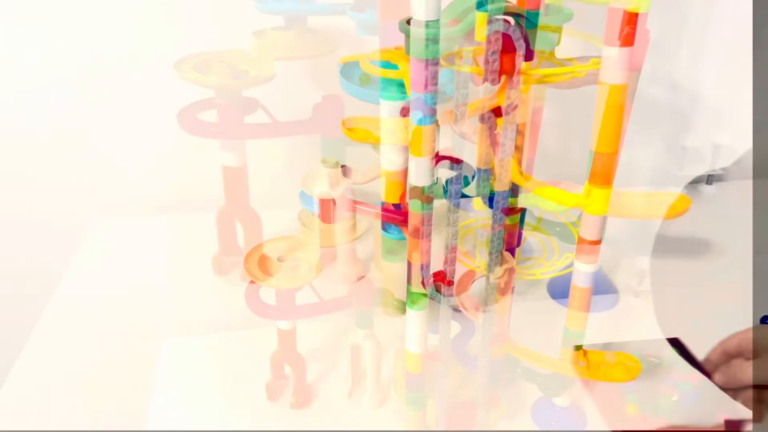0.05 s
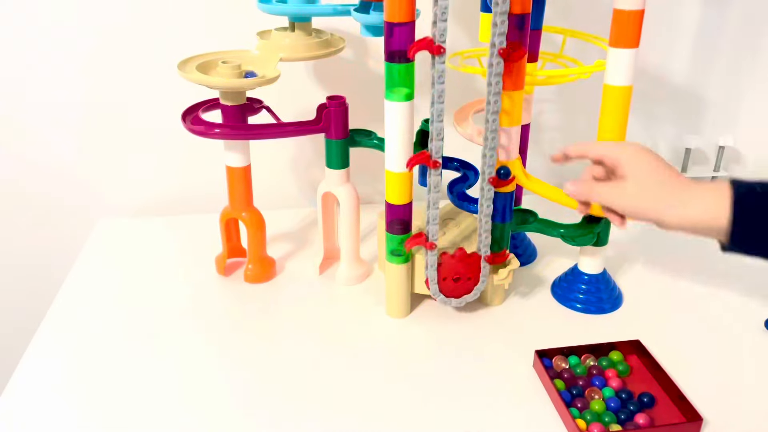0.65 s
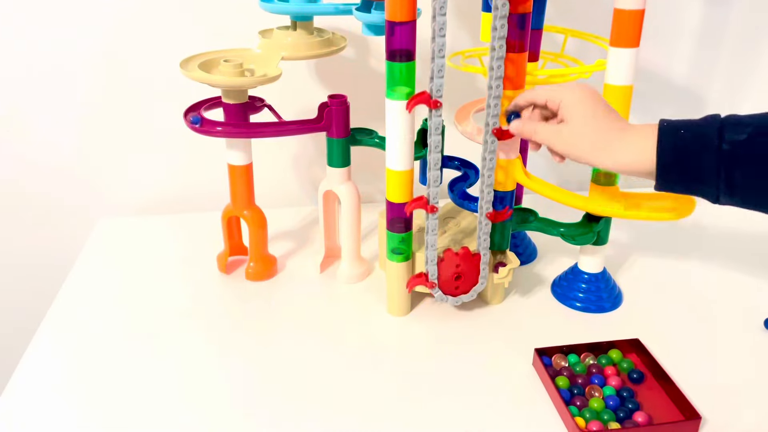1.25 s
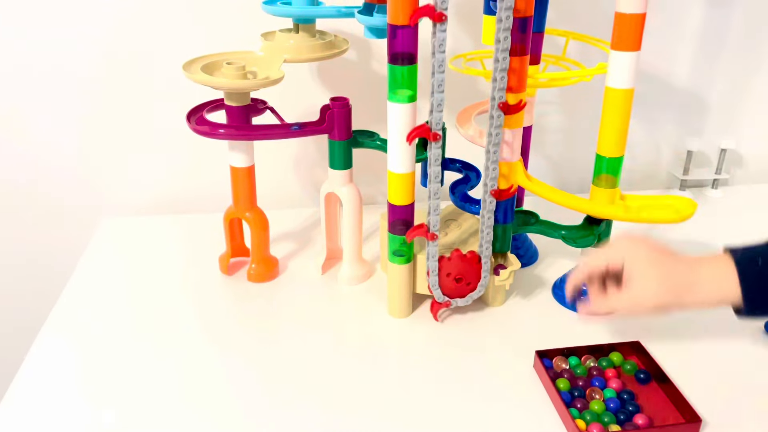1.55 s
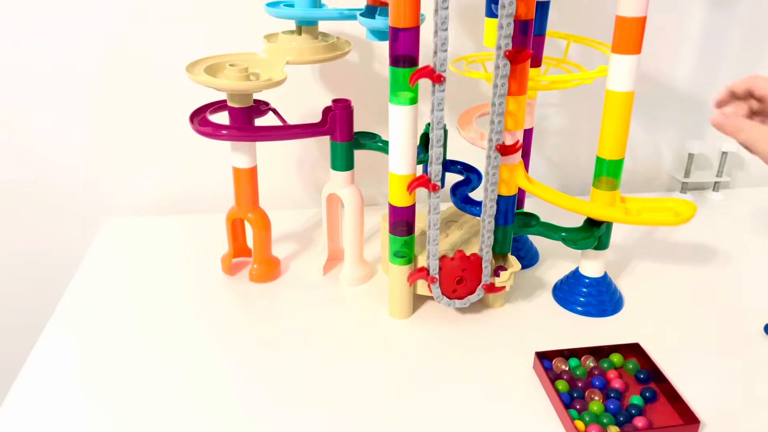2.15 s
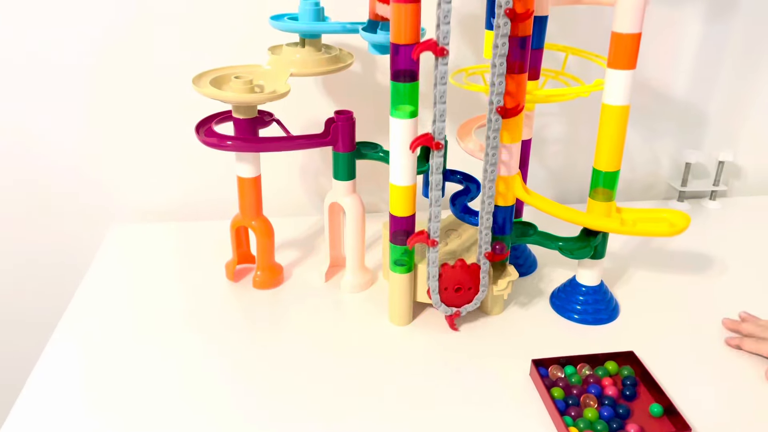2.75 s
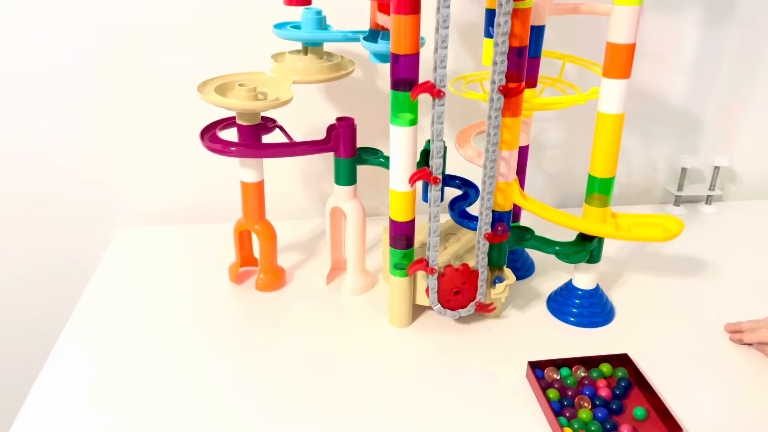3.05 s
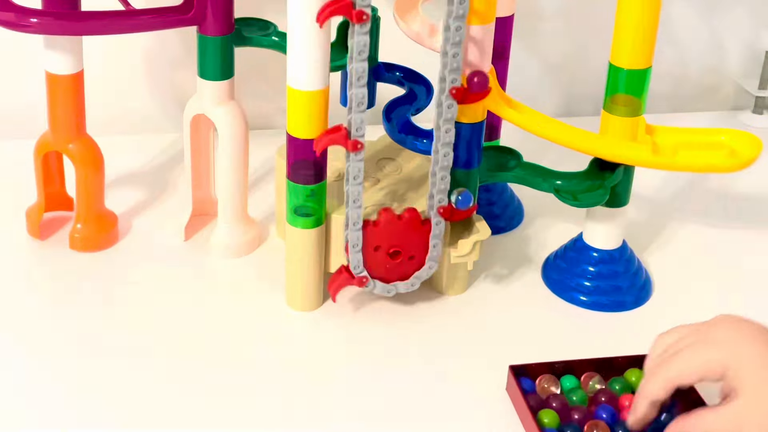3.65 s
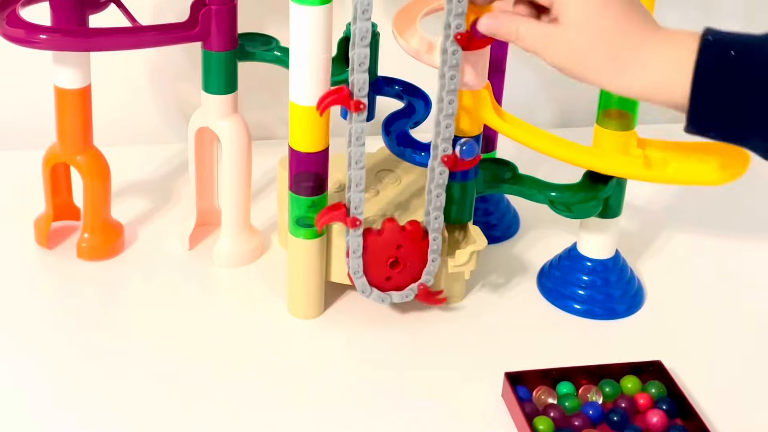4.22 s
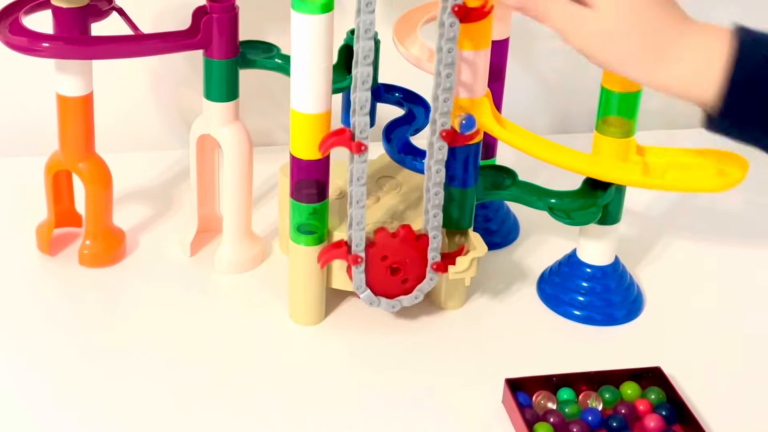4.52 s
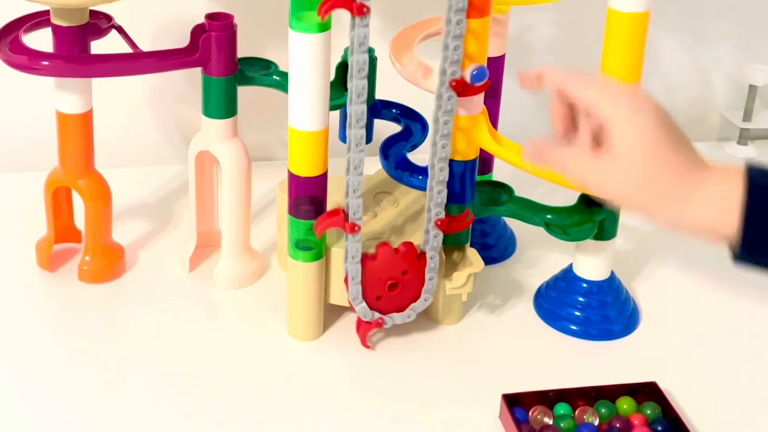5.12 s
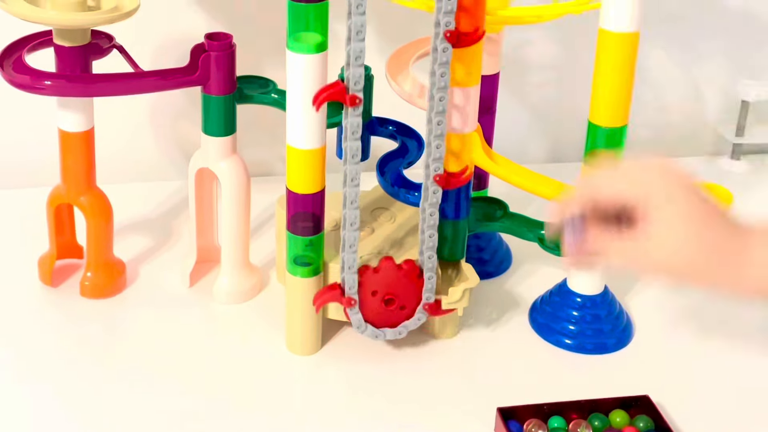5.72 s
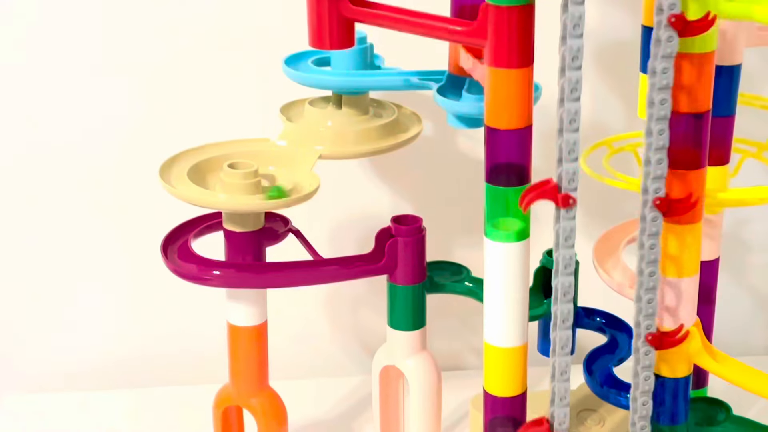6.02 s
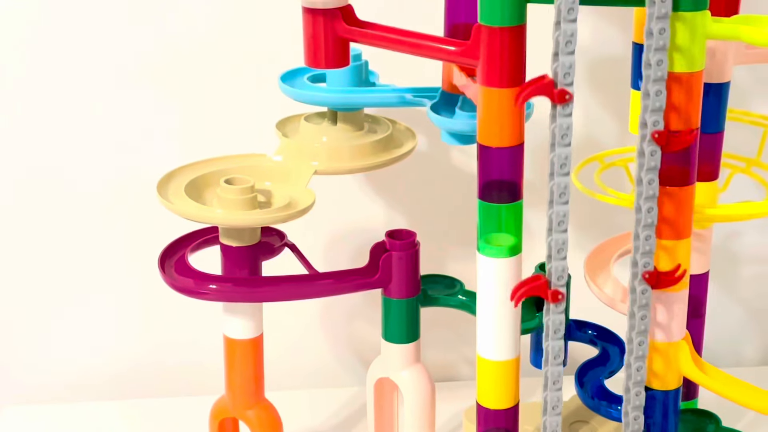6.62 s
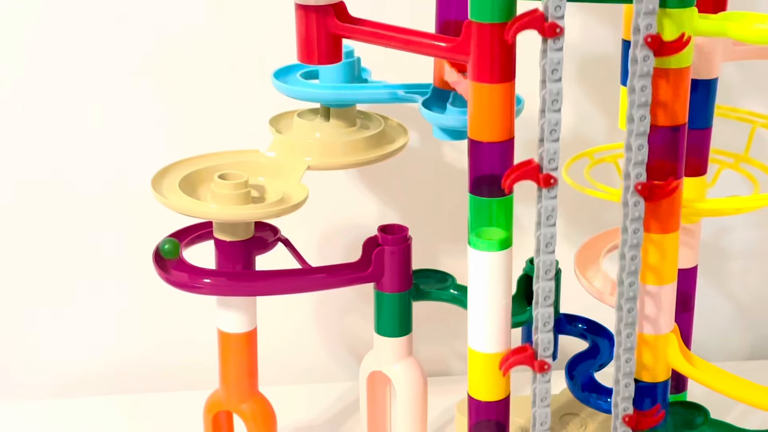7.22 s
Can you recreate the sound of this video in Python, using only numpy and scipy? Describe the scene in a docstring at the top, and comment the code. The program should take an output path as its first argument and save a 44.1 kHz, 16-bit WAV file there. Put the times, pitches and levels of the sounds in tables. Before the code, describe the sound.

A toy chain lift whirrs steadily while marbles clatter and rumble through plastic chutes, one finally circling a funnel.

```python
"""Glass marbles click and roll down a plastic toy track, over the fluttering whirr of a geared lift motor.
Each blow ticks, rings the modes of one track piece and thumps the table through the towers.
Rolling marbles rumble and rattle over seams; late on, one circles a funnel.
The lift gear binds twice a turn, its teeth whine, its chain ticks.
A soft, wavering hum near 740 Hz swells and fades near the end. Small room, close stereo."""
import sys
import numpy as np
from scipy import signal
from scipy.fft import rfft, irfft
from scipy.io import wavfile
from scipy.ndimage import uniform_filter1d

SR = 44100
rng = np.random.default_rng(int(sys.argv[2]) if len(sys.argv) > 2 else 0)


def wav_out(sig):
    """Save sig, one row per channel (or a flat mono array), as 16-bit PCM at SR to the path in sys.argv[1]."""
    wavfile.write(sys.argv[1], SR, np.round(np.clip(np.atleast_2d(sig).T, -1, 1) * 32767).astype(np.int16))


N = 329408
RING_SAMPLES, ATTACK_SAMPLES = int(.36 * SR), int(.02 * SR)

# lift motor: (time [s], turn rate [Hz], level [dB], whine re level [dB])
MOTOR = [(0, 25.94, -56.5, -8), (.5, 26.23, -48, -5), (1.15, 25.2, -49.5, -3), (1.6, 25.73, -51.5, -4.5),
         (2.5, 26.2, -49, -2.5), (3.35, 26.1, -49, -5), (4.5, 26.27, -49.5, -4), (4.85, 26.09, -49.5, -0.5),
         (5.3, 25.33, -49, -4.5), (5.75, 25.42, -50, -6.5), (6.3, 25.73, -46, -5.5),
         (6.9, 26.07, -42, -3.5), (7.47, 26.2, -42, -5)]
# gearbox and whine resonances: (frequency [Hz], width [Hz], level [dB])
GEARBOX_MODES = [(133.6, 15, -13.5), (251.5, 40, -12), (735, 35, -9), (808, 30, -9), (1035, 25, -14),
                 (1215, 60, -7), (1620, 60, -16), (2050, 160, -9)]
WHINE_MODES = [(1416, 65, 0), (1487, 70, -.5), (1380, 130, -9)]
# soft hum near the end: (time [s], level [dB])
HUM_LEVEL = [(6.45, -88), (6.7, -47.5), (7.08, -53), (7.25, -77)]

# gear teeth, rolling, plastic overtones, glass on plastic: (frequency [Hz], level [dB])
TEETH_SPECTRUM = [(25, -22), (55, 3.5), (250, 2), (600, -4.5), (950, -7), (1420, 4), (1750, 1), (2100, 2.5),
                  (2500, -10.5), (4000, -15.5), (7000, -27), (8700, -65), (11500, -29), (16000, -36)]
RUMBLE_SPECTRUM = [(25, -40), (55, 2.5), (140, -16), (190, 0.5), (260, 4), (340, -12.5), (500, 4),
                   (700, 4.5), (1100, 1.5), (2000, -4.5), (3000, -6.5), (6000, -46)]
PLASTIC_SPECTRUM = [(200, -39.5), (350, -6), (550, 1), (1200, 7), (2000, 4.5), (3500, -1), (5000, -4.5),
                    (7000, -11.5), (8700, -34), (11000, -18.5), (16000, -44.5)]
CONTACT_SPECTRUM = [(1000, -0.5), (4000, 10.5), (7000, 5.5), (8700, -8.5), (10500, 3.5), (14000, 4),
                    (16000, -8)]

# modes of the table and each track piece: (frequency [Hz], width [Hz], level [dB])
TABLE_MODES = [(92, 16, -16), (120.4, 7.2, -3.5), (142, 4.5, 2.5), (211, 10, -11), (230, 9, -11),
               (267, 7, -7), (403, 15, -17)]
CHUTE = [(466, 15, 3), (501, 13.6, 6.5), (614, 40, -1), (737, 20, -1.5), (985, 76, -4.5), (1710, 116, 8.5),
         (2054, 71, -1.5), (2840, 65, -5), (3265, 43, -10), (3455, 91, -8), (4345, 65, -7),
         (4580, 72, -8.5), (4910, 280, -7)]
RAMP = [(607, 58, 1.5), (776, 38, -2.5), (960, 126, 5), (1484, 140, 6), (1716, 50, 2), (1930, 140, 4.5),
        (2290, 130, 2.5), (2850, 99, 3), (3200, 200, 1), (5000, 610, -6)]
STEPS = [(735, 20, -15), (1024, 22, -12), (1570, 280, 3.5), (2730, 1600, 4), (3414, 120, 5),
         (3970, 93, -2.5), (4480, 130, 5), (5040, 130, -1), (5020, 110, 6.5), (5450, 180, 1),
         (6290, 210, 3.5)]
SLIDE = [(473, 33, -5), (600, 13, -3), (734, 22, 3), (1048, 40, -4), (1435, 110, 7)]
SPIRAL = [(868, 35, -17), (1420, 65, -10), (1615, 35, -8), (1790, 120, -1), (2050, 220, -3),
          (3180, 210, -.5), (4400, 260, -13)]
LOOP = [(585, 31, -8), (750, 190, 4.5), (973, 27, -4.5), (1385, 120, 12), (1820, 35, -10), (2860, 120, -23)]
BEND = [(869, 28, -3), (1450, 46, -18), (1640, 210, 4.5), (1750, 45, -3.5), (2840, 71, -12),
        (3100, 200, -2), (3450, 43, -20), (4310, 230, -2), (5210, 450, 2)]
FUNNEL = [(400, 70, 7), (490, 50, 3), (595, 60, 6), (732, 43, 13), (900, 260, 13), (1170, 60, 9),
          (1520, 240, 15), (1820, 110, 13), (2100, 260, 12), (2480, 400, 20), (4210, 300, 16),
          (4550, 300, 11), (5050, 400, 15), (6730, 400, 9)]
TRAY = [(607, 64, 6.5), (763, 77, 5), (950, 91, -1.5), (1424, 160, 5), (1704, 80, -2), (2320, 170, -4),
        (2860, 220, -12), (3570, 300, -2)]
TUBE = [(500, 15, 10), (750, 26, -4), (1570, 82, 2), (2150, 60, -3), (2300, 60, -4), (2650, 80, -6),
        (3250, 80, -4), (3540, 130, -2), (4880, 190, 1), (5220, 220, 1), (6470, 240, -6)]
# piece being struck: (start [s], modes, overtones re modes [dB], thump re knock [dB],
# tick re strength [dB], bearing [+ left, - right])
ROUTE = [(0, CHUTE, -6, -17.5, -3, 0.8), (.8, RAMP, -2, -11, -4.5, 0.68), (1.09, LOOP, -11, -41, -10, 1),
         (1.5, CHUTE, -6.5, -12.5, -9.5, 0.87), (1.95, SLIDE, 4.5, -5.5, -9.5, 0.71),
         (2.6, RAMP, 0, -19, -13, 0.68), (2.93, TRAY, -4.5, -16, -10.5, 0.73),
         (3.4, STEPS, 0, -13.5, -7, 1), (3.87, SPIRAL, -11.5, -27.5, -9, 0.94),
         (4.19, BEND, -4, -24.5, -14, 1.2), (4.8, RAMP, -3, -19, -4.5, 1.03),
         (5.8, FUNNEL, -5.5, -12.5, -5, -0.62), (6.3, STEPS, 9, -18, -10, 1),
         (6.58, TUBE, -7.5, -10, -1, 1.05)]

# rolls along the track: (start [s], length [s], rumble [dB], rattle [dB], table drone [dB])
RUNS = [(-.03, 0.23, -48, -44, -54), (0.248, 0.093, -47.5, -44, -58), (0.381, 0.52, -45, -51.5, -64),
        (0.753, 0.28, -45.5, -53, -63), (1.153, 0.93, -45, -50.5, -77), (1.572, 0.12, -57, -45.5, -60),
        (1.747, 0.35, -44, -57, -44), (2.013, 0.13, -46.5, -63, -54), (2.21, 0.31, -44.5, -50, -42),
        (2.533, 0.28, -45.5, -57, -71), (2.79, 0.33, -40.5, -70, -56), (3.45, 0.087, -47, -63, -52),
        (3.693, 0.49, -49.5, -53, -57), (4.25, 0.21, -65, -64, -47), (4.91, 0.066, -47, -54, -56.5),
        (6.023, 0.32, -42.5, -50.5, -74), (6.346, 0.31, -44.5, -48.5, -71), (6.628, 0.18, -54, -39, -48)]
# marble circling the funnel: (time [s], level [dB])
SWIRL_LEVEL = [(5.85, -69), (5.98, -48.5), (6.1, -44.5), (6.2, -42), (6.3, -46.5), (6.45, -56), (6.6, -55),
               (6.8, -59)]
# scrapes in the funnel throat: (start [s], length [s], level [dB])
SCRAPES = [(6.361, 0.038, -42), (6.444, 0.09, -47.5)]
# modes rung by circling and by scraping: (frequency [Hz], width [Hz], level [dB])
SWIRL_MODES = [(510, 24, -9), (828, 55, -4.5), (1046, 190, -1), (1217, 49, 5), (1533, 170, 4.5),
               (1900, 210, -1.5), (2105, 93, -1)]
THROAT_MODES = [(2097, 72, 3.5), (2550, 51, -7), (2920, 68, -10), (3570, 140, -3), (4700, 78, -22)]

# tumbles between walls: (start [s], length [s], strength [dB], hardness [dB])
TUMBLES = [(0.714, 0.097, -41, 2), (1.7, .1, -41, 3.5), (2.209, .2, -47.5, -3.5), (2.89, 0.024, -45, -7),
           (2.975, .11, -56, -14), (3.113, 0.087, -52, -10.5), (3.443, .04, -52.5, 5),
           (3.73, 0.14, -47, 4.5), (3.949, 0.26, -55, -18.5), (4.236, 0.054, -43, -2.5),
           (4.369, .045, -51, 1), (6.605, 0.082, -41.5, 12), (6.685, 0.11, -45.5, 0.5)]
# landings and wall hits; hardness favours clack over knock: (time [s], strength [dB], hardness [dB])
HITS = [(0.0524, -48.5, 2), (0.118, -46.5, 8.5), (0.216, -56.5, 8), (0.2605, -51.5, 0), (0.5602, -61.5, 26),
        (0.648, -47.5, 13), (0.7078, -39, 14), (0.7181, -39.5, -5.5), (0.738, -37.5, 9), (0.7588, -39.5, 8),
        (0.7774, -36.5, 3), (0.7845, -39.5, 17), (0.8082, -31.5, 1), (0.8165, -30.5, -2),
        (0.9056, -39, -0.5), (0.925, -44, -2), (0.9422, -41.5, -2), (1.002, -42.5, 3), (1.0378, -41.5, 5),
        (1.073, -43.5, -5), (1.0972, -40, 1), (1.1036, -36.5, -7), (1.56, -52, 5), (1.658, -48, 15),
        (1.694, -32, 5), (1.7195, -32, 12), (1.7284, -36, 10), (1.7382, -36, 11.5), (1.768, -37, 5),
        (1.7829, -36, 0), (1.7974, -33, 0.5), (1.8442, -37, 7), (2.007, -43.5, -1.5), (2.0554, -49.5, -6),
        (2.181, -51.5, 2), (2.2023, -38, 8.5), (2.2974, -42.5, 12), (2.32, -32, 9), (2.4726, -49.5, 6),
        (2.713, -51.5, -1), (2.7627, -52, -14), (2.799, -32.5, 1.5), (2.812, -33, -7), (2.874, -37.5, -1),
        (2.888, -27, -1.5), (2.895, -31.5, 3), (2.9051, -33.5, -5), (2.9549, -36, -2), (3.0037, -38.5, -1),
        (3.0325, -39, -2), (3.0896, -41.5, -8.5), (3.1074, -40, -8), (3.2275, -46.5, -6),
        (3.2685, -41.5, -3), (3.438, -41, 13), (3.466, -41.5, 8), (3.505, -42.5, 10.5),
        (3.7137, -33.5, 11.5), (3.7389, -38, 8), (3.7782, -42.5, 9), (3.7949, -38.5, 0.5),
        (3.8168, -37.5, 4), (3.8493, -44.5, 0), (3.884, -42.5, 10), (3.9208, -43, 4), (4.006, -42, -6),
        (4.087, -40, -1), (4.162, -41.5, 3), (4.2192, -35.5, 15), (4.2464, -37, 7), (4.276, -44, 1),
        (4.3255, -41, 0), (4.366, -40, 7), (4.9021, -53.5, -8), (4.959, -49, -13), (5.172, -64, -2),
        (5.2008, -63.5, -2), (5.8502, -28, -6.5), (6.3401, -58, 9), (6.5382, -44.5, 13),
        (6.5984, -36, 12.5), (6.6228, -38, 17), (6.6344, -34.5, 13), (6.6528, -34, 12), (6.696, -34.5, 7),
        (6.7302, -38, 11), (6.7652, -50, 5), (7.3677, -60.5, 13), (7.425, -60.5, 15)]

# stereo width; bass and highest treble sit in the centre: (frequency [Hz], side gain [dB])
STEREO_WIDTH = [(100, -12.5), (500, -8), (1200, -38), (2800, -6.5), (5500, -8), (8500, 13), (10000, 11),
                (11500, -8), (16000, -51)]
# overall gain, dipping after the funnel drop: (time [s], gain [dB])
LEVEL_DIP = [(5.915, 3), (5.945, -2), (5.954, -22), (5.963, -12), (5.99, 0.5), (6.02, -4.5)]


def amp(db):
    """Decibels to gain."""
    return 10 ** (np.asarray(db) / 20)


def unit(x, size=None):
    """Scale to rms 1 over the first size samples."""
    return x / np.sqrt(np.mean(x[:size] ** 2) + 1e-20)


def curve(rows, column=1):
    """Timed table column, interpolated per sample."""
    rows = np.array(rows)
    return np.interp(np.arange(N) / SR, rows[:, 0], rows[:, column])


def gains(spectrum, size):
    """Spectrum as gains at FFT bins."""
    hz, db = np.transpose(spectrum)
    return amp(np.interp(np.log(np.fft.rfftfreq(size, 1 / SR) + 1), np.log(hz), db))


def colour(x, spectrum, size=4096):
    """Minimum-phase filter with the given spectrum."""
    cepstrum = irfft(np.log(gains(spectrum, size)))
    cepstrum[1:size // 2] *= 2
    cepstrum[size // 2 + 1:] = 0
    return signal.fftconvolve(x, irfft(np.exp(rfft(cepstrum))))[:len(x)]


def butter(x, order, hz, kind):
    """Butterworth filter."""
    return signal.sosfilt(signal.butter(order, hz, kind, fs=SR, output="sos"), x)


def fade(t60_s):
    """Exponential decay."""
    return np.exp(-np.log(1000) * np.arange(RING_SAMPLES) / SR / t60_s)


def rings(modes):
    """One damped sine per mode; level sets its energy."""
    t = np.arange(RING_SAMPLES) / SR
    return np.array([
        (-1) ** k * amp(db) * np.sqrt(width) * np.exp(-np.pi * width * t) * np.sin(2 * np.pi * hz * t)
        for k, (hz, width, db) in enumerate(modes)])


def resonate(x, modes):
    """Drive a set of modes; rms 1."""
    return unit(signal.fftconvolve(x, rings(modes).sum(0))[:N])


def walk(rate_hz):
    """Slow random drift; rms 1."""
    hold = int(SR / rate_hz)
    steps = np.repeat(rng.standard_normal(N // hold + 1), hold)
    return unit(uniform_filter1d(steps, hold)[:N])


def grains(rate_hz, spread_db):
    """Tiny random impacts of unequal size."""
    impacts = (rng.random(N) < rate_hz / SR) * rng.standard_normal(N)
    return impacts * amp(spread_db * rng.standard_normal(N))


def tone(hz, waver, waver_hz, flutter_db, flutter_hz):
    """Sine with drifting pitch and level; rms 1."""
    pitch_hz = hz * (1 + waver * walk(waver_hz))
    return unit(np.sin(2 * np.pi * np.cumsum(pitch_hz) / SR) * amp(flutter_db * walk(flutter_hz)))


def room(x, low_t60_s=.37, high_t60_s=.22, onset_s=.0004):
    """Diffuse reflections off table and walls; little bass, treble dies first."""
    noise = rng.standard_normal(RING_SAMPLES)
    lows = butter(noise, 1, 1500, "low")
    tail = lows * fade(low_t60_s) + (noise - lows) * fade(high_t60_s)
    onset = (1 - fade(np.log(1000) * onset_s)) ** 2
    tail = butter(tail * onset, 2, 260, "high")
    return signal.fftconvolve(x, tail / np.linalg.norm(tail))[:N]


def hum():
    """A soft, wavering hum swells and fades near the end."""
    return amp(curve(HUM_LEVEL)) * tone(hz=742, waver=.006, waver_hz=25, flutter_db=1.5, flutter_hz=48)


def chain(level_db=-80, count=30, spread_db=2, t60_s=.01):
    """Loose lift chain links tick faintly at random."""
    clicks = np.zeros(N)
    clicks[rng.integers(0, N, count)] = amp(spread_db * rng.standard_normal(count))
    tick = colour(rng.standard_normal(RING_SAMPLES) * fade(t60_s), CONTACT_SPECTRUM)
    return amp(level_db) * unit(signal.fftconvolve(clicks, tick)[:N])


def lift(teeth=56, release_turns=.97, weak_gain=.44, knock_db=3, box_db=-2.5, mesh_db=-6, whirr_db=-5.5):
    """The gear binds twice a turn, strong then weak; the gearbox rings, the teeth whine with load."""
    turns = np.cumsum(curve(MOTOR) * (1 + .004 * walk(rate_hz=12))) / SR
    strong, weak = (np.diff(np.floor(turns + lag), prepend=0) for lag in (0, .5))
    knocks = (strong + weak_gain * weak) * amp(1.3 * rng.standard_normal(N))
    strong_bind, weak_bind = (np.exp(-((turns + lag) % 1) / release_turns) for lag in (0, .5))
    load = .4 + .6 * (strong_bind + weak_gain * weak_bind)
    scrape = unit(load * rng.standard_normal(N))
    drive = scrape + amp(knock_db) * unit(knocks)
    backlash_rad = .55 * walk(rate_hz=50)
    mesh = unit(load * np.sin(2 * np.pi * teeth * turns + backlash_rad))
    whirr = unit(amp(box_db) * resonate(drive, GEARBOX_MODES) + unit(colour(scrape, TEETH_SPECTRUM)))
    whine = unit(resonate(drive, WHINE_MODES) + amp(mesh_db) * mesh)
    level_db, whine_db = curve(MOTOR, column=2), curve(MOTOR, column=3)
    return amp(level_db) * (amp(whirr_db) * whirr + amp(whine_db) * whine)


def run_gains(attack_s=.0088, release_s=.029, slowing_db_per_s=9.5, far_db=(-57, -67, -65)):
    """Rumble, rattle and drone gains: runs build, slow and die over a floor of far marbles."""
    t = np.arange(N) / SR
    power = amp(far_db)[:, None] ** 2
    for start_s, length_s, *levels_db in RUNS:
        age_s = np.maximum(t - start_s, 0)
        shape = np.minimum(age_s / attack_s, 1) * amp(-slowing_db_per_s * age_s)
        shape *= np.exp(-np.maximum(age_s - length_s, 0) / release_s)
        power = power + np.outer(amp(levels_db), shape) ** 2
    return np.sqrt(power)


def rolling(rumble_db=-5, rattle_db=-4.5, drone_db=-8, chute_db=-5, steps_db=-12.5, tick_db=-14):
    """Marbles drum on uneven track and skip seams; the table drones, mostly on its strongest mode."""
    drum = grains(rate_hz=4000, spread_db=3) * amp(3.9 * walk(rate_hz=22))
    rumble = unit(colour(drum, RUMBLE_SPECTRUM)) + amp(chute_db) * resonate(drum, CHUTE)
    skips = grains(rate_hz=2200, spread_db=3) * amp(2.5 * walk(rate_hz=30))
    rattle = (unit(colour(skips, PLASTIC_SPECTRUM))
              + amp(steps_db) * resonate(skips, STEPS)
              + amp(tick_db) * unit(colour(skips, CONTACT_SPECTRUM)))
    main_mode = tone(hz=142, waver=.014, waver_hz=15, flutter_db=3.5, flutter_hz=15)
    drone = .5 * main_mode + resonate(drum, TABLE_MODES)
    rumble_gain, rattle_gain, drone_gain = run_gains()
    return (amp(rumble_db) * rumble_gain * unit(rumble)
            + amp(rattle_db) * rattle_gain * unit(rattle)
            + amp(drone_db) * drone_gain * unit(drone))


def swirl():
    """A marble roars round the funnel and scrapes its throat."""
    t = np.arange(N) / SR
    drum = grains(rate_hz=3000, spread_db=2.5)
    roar = amp(curve(SWIRL_LEVEL)) * resonate(drum, SWIRL_MODES)
    pressure = sum(amp(db) * np.sqrt(np.maximum(1 - (2 * (t - start_s) / length_s - 1) ** 2, 0))
                   for start_s, length_s, db in SCRAPES)
    return roar + pressure * resonate(drum, THROAT_MODES)


def tumbles(count=16, loss_db=5, scatter_db=2.2):
    """Strings of uneven, weakening bounces; rows as in HITS."""
    blows = []
    for start_s, length_s, db, hard_db in TUMBLES:
        along = (np.arange(count) + rng.random(count)) / count
        strength, hardness = scatter_db * rng.standard_normal((2, count))
        blows += zip(start_s + length_s * along, db - loss_db * along + strength, hard_db + 2 * hardness)
    return blows


def overtones(t60_s=.045):
    """Dense short rings of a thin wall; each spot favours a few, most of all in the treble."""
    hz = np.geomspace(400, 16000, num=64)
    scatter_db = np.interp(hz, [1800, 4000], [2.5, 5.5])
    favoured = np.column_stack([hz, scatter_db * rng.standard_normal(len(hz))])
    burst = rng.standard_normal(RING_SAMPLES) * fade(t60_s)
    return colour(colour(burst, PLASTIC_SPECTRUM), favoured)


def chatter(blow, rebound, gap_s=.005, count=2):
    """The marble rebounds on the wall within milliseconds, weaker each time."""
    out = blow.copy()
    lags = np.cumsum(gap_s * SR * rng.uniform(.5, 1.5, count)).astype(int) + 1
    for k, lag in enumerate(lags):
        out[lag:] += rebound ** (k + 1) * blow[:-lag]
    return out


def strikes(scatter_db=2, detune=.008, split_hz=2500,
            knock_db=-2.8, clack_db=-5.5, thump_db=-3.5, tick_db=-1):
    """Blows ring a piece, shake the table and tick. Returns the plain and bearing-weighted sums."""
    out = np.zeros((2, N + RING_SAMPLES))
    starts_s = [row[0] for row in ROUTE]
    piece_rings = [rings(row[1]) for row in ROUTE]
    table_rings = butter(rings(TABLE_MODES), 1, 70, "high")
    spread = 1 - fade(t60_s=.016)  # bending wave spreads through the piece
    age = np.arange(RING_SAMPLES)
    for time_s, db, hard_db in HITS + tumbles():
        k = max(np.searchsorted(starts_s, time_s) - 1, 0)
        modes = piece_rings[k]
        dense_db, table_db, glass_db, bearing = ROUTE[k][2:]
        # struck spot weights the modes; marble mass shifts their pitch
        spot = amp(scatter_db * rng.standard_normal(len(modes))) * rng.choice([-1, 1], len(modes))
        ring = np.interp(age * (1 + detune * rng.standard_normal()), age, spot @ modes)
        shell = chatter(spread * overtones(), rebound=.55)
        piece = unit(spread * ring, ATTACK_SAMPLES) + amp(dense_db) * unit(shell, ATTACK_SAMPLES)
        knock, clack = (butter(piece, 3, split_hz, kind) for kind in ("low", "high"))
        contact = rng.standard_normal(RING_SAMPLES) * spread * fade(t60_s=.012)
        tick = colour(chatter(contact, rebound=.084), CONTACT_SPECTRUM)
        thump = rng.choice([-1, 1], len(table_rings)) @ table_rings
        blow = (amp(knock_db - hard_db / 2) * unit(knock, ATTACK_SAMPLES)
                + amp(clack_db + hard_db / 2) * unit(clack, ATTACK_SAMPLES)
                + amp(thump_db + table_db - hard_db / 2) * unit(thump, ATTACK_SAMPLES)
                + amp(tick_db + glass_db) * unit(tick, ATTACK_SAMPLES))
        start = int(time_s * SR)
        out[:, start:start + RING_SAMPLES] += np.outer([1, bearing], amp(db) * blow)
    return out[:, :N]


def scene(wet_db=-7, diffuse_db=-4):
    """Mid/side mix; most of the track stands left, so the left channel leads slightly."""
    blows, blows_aside = strikes()
    steady = rolling() + swirl() + hum() + lift() + chain()
    toy = blows + steady
    walls = amp(wet_db) * room(toy)
    mid = toy + walls
    left_lead = irfft(1j * gains(STEREO_WIDTH, N) * rfft(blows_aside + steady + walls), N)
    # bass and highest treble stay near the centre
    diffuse = butter(room(toy), 1, [700, 9000], "band")
    side = amp(diffuse_db) * diffuse + left_lead
    return np.array([mid + side, mid - side])


def record(dry):
    """The level dips once and settles lower; steep low-pass."""
    lowpass = signal.ellip(8, .2, 70, 16100, fs=SR, output="sos")
    return signal.sosfilt(lowpass, dry * amp(curve(LEVEL_DIP)))


dry = scene()
out = record(dry)
wav_out(out)
```